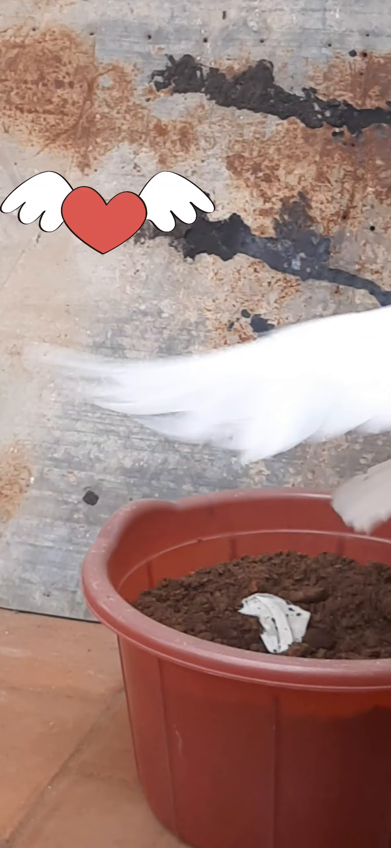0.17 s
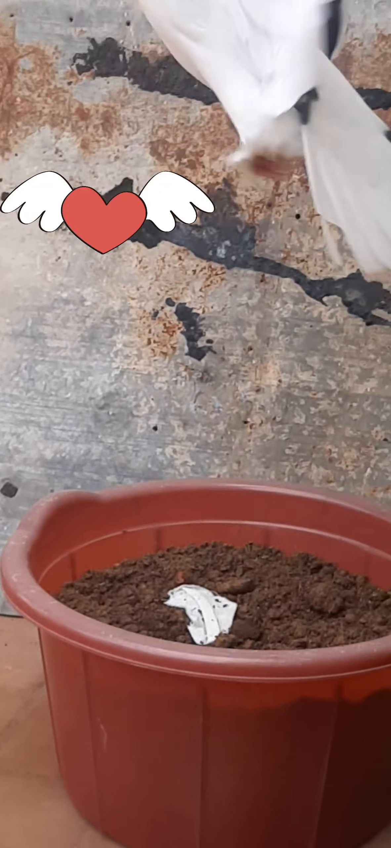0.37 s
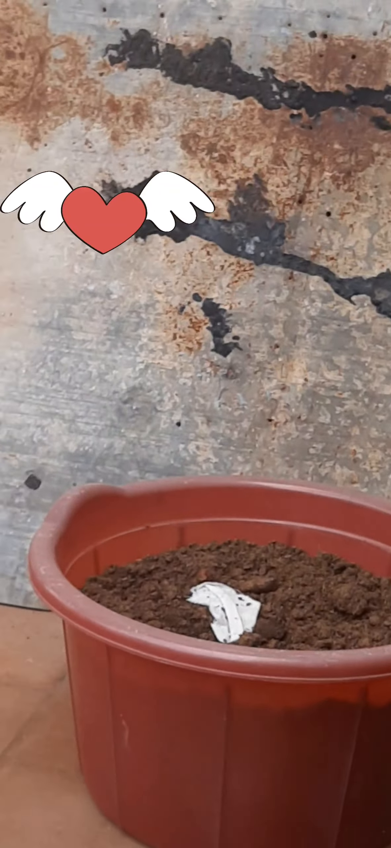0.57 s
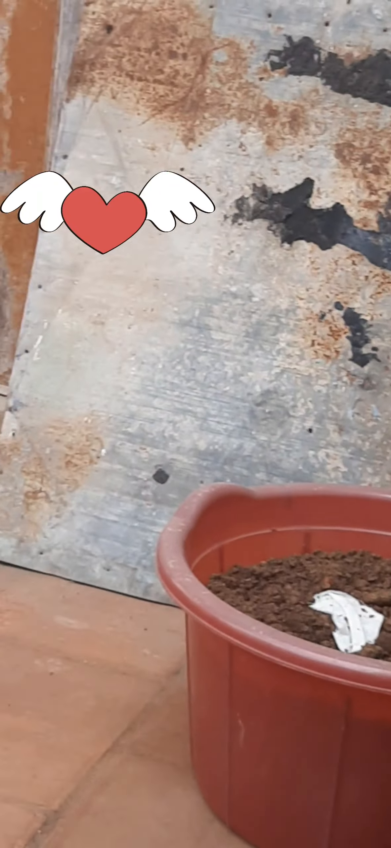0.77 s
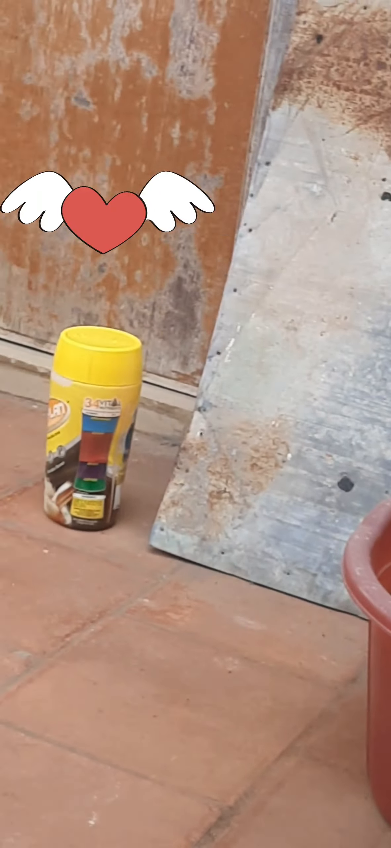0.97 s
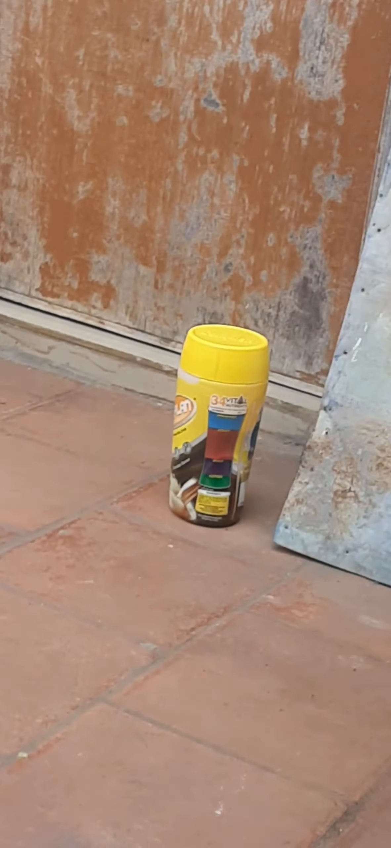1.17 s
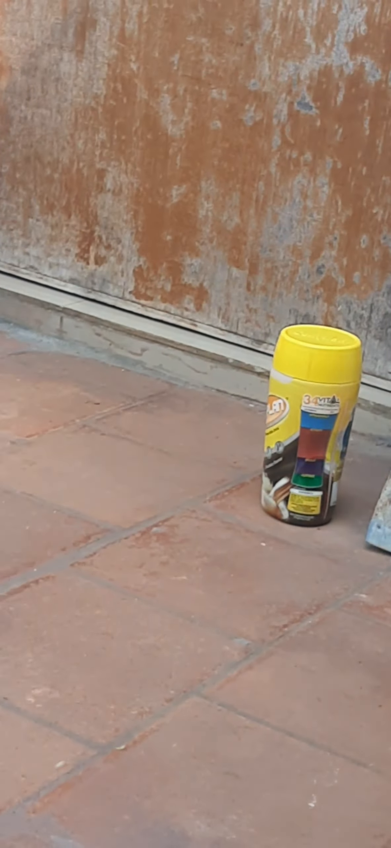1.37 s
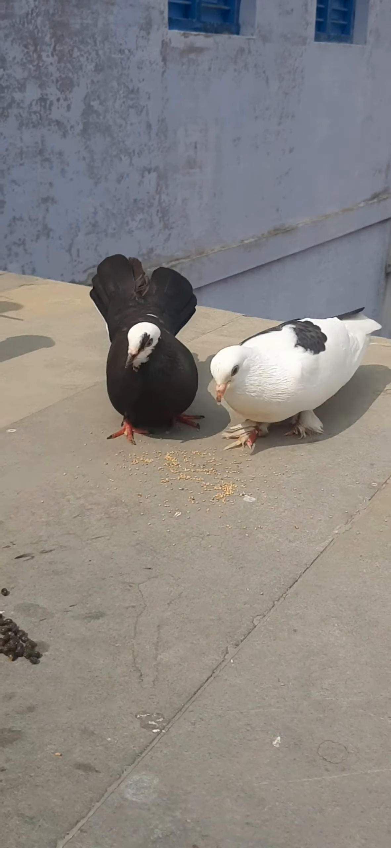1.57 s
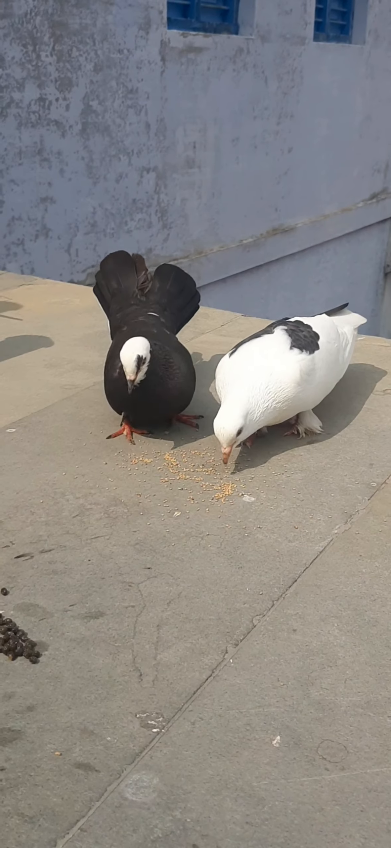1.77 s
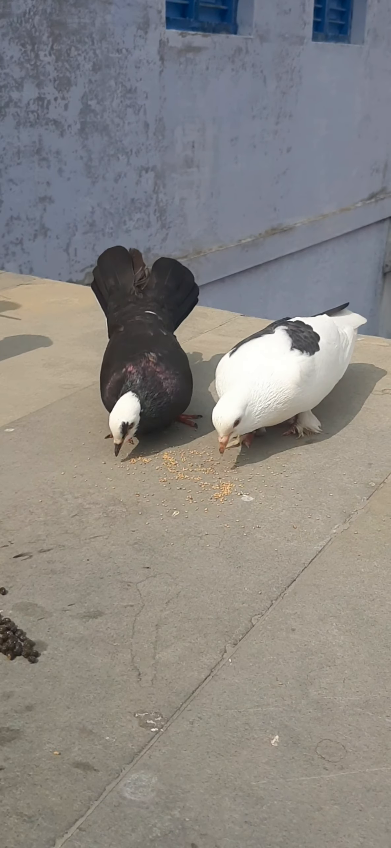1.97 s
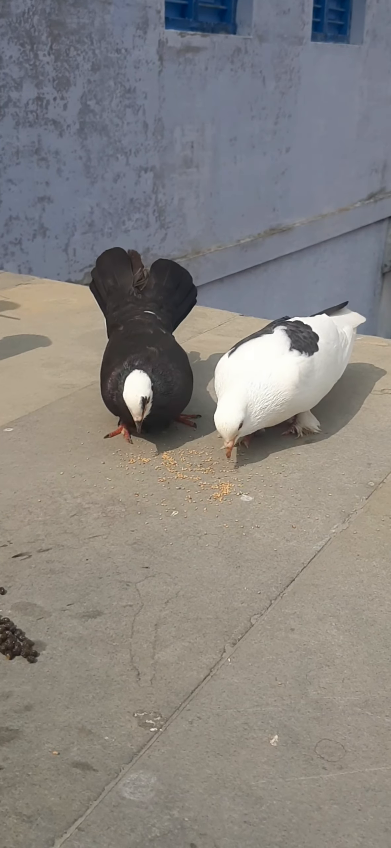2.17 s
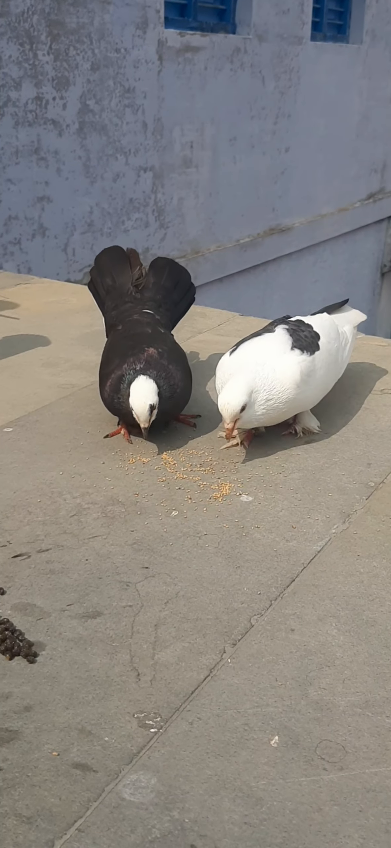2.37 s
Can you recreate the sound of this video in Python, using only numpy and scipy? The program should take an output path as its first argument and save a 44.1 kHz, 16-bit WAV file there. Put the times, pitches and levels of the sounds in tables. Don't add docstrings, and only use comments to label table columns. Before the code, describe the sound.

A pigeon's wings clap loudly in a hard-walled yard as it takes off, then near-quiet outdoor air

```python
import sys
import numpy as np
from scipy import signal
from scipy.fft import rfft, irfft
from scipy.io import wavfile
from scipy.ndimage import uniform_filter1d

SR = 44100
rng = np.random.default_rng(int(sys.argv[2]) if len(sys.argv) > 2 else 0)


def log_audio(samples):
    frames = np.atleast_2d(samples).T
    limited = np.clip(frames, -1, 1)
    pcm = np.round(limited * 32767).astype(np.int16)
    wavfile.write(sys.argv[1], SR, pcm)


def convert_level_to_amplitude(level_db):
    exponent = np.asarray(level_db, float) / 20
    return 10 ** exponent


N = 110250

# freq_hz, likeness
LIKENESS = [(60, 1), (130, 0.8), (290, 1), (640, -0.046), (1400, -0.018), (3100, -0.019)]


def evened(x):
    return x / np.sqrt(np.mean(x ** 2) + 1e-20)


def read(points, hz):
    f, value = np.transpose(points)
    return np.interp(np.log(hz + 1), np.log(f + 1), value)


def curve(rows, column=1):
    rows = np.array(rows)
    return np.interp(np.arange(N) / SR, rows[:, 0], rows[:, column])


def add(mix, start_s, sound):
    part = mix[..., round(start_s * SR):][..., :sound.shape[-1]]
    part += sound[..., :part.shape[-1]]


def resonate(x, hz, width_hz):
    turn = np.exp(2j * np.pi * np.cumsum(hz * np.ones(x.shape[-1])) / SR)
    r = np.exp(-np.pi * width_hz / SR)
    return 2 * (turn * signal.lfilter([(1 - r) ** 2], [1, -2 * r, r * r], x / turn)).real


def wobble(count, span_s):
    span = int(span_s * SR) + 1
    once = uniform_filter1d(rng.standard_normal(count), span)
    return evened(uniform_filter1d(once, span))


def paired(left, other, hz):
    same = np.clip(read(LIKENESS, hz), -1, 1)[:, None]
    return np.array([left, same * left + np.sqrt(1 - same ** 2) * other])


def air(colour, patchy_db):
    hz = np.fft.rfftfreq(1024, 1 / SR)
    a, b, c, d, patches = rng.standard_normal((N // 256 + 5, 513, 5)).T
    patches = evened(uniform_filter1d(uniform_filter1d(patches, 14, 0), 6, 1))
    z = paired(a + 1j * b, c + 1j * d, hz)
    z = z * convert_level_to_amplitude(read(colour, hz)[:, None] + patchy_db * patches)
    return evened(signal.istft(z, nperseg=1024, noverlap=768)[1][:, :N])


def yard(x):
    # freq_hz, t60_s
    decay = [(200, 0.07), (1000, 0.64), (4000, 0.29), (15000, 0.3)]
    taps = np.zeros((2, SR // 2))
    at = np.arange(200, SR // 2 - 20, 20) + rng.integers(0, 20, (2, (SR // 2 - 201) // 20))
    np.put_along_axis(taps, at, rng.choice([-1., 1.], at.shape), 1)
    hz, t, z = signal.stft(taps, SR, nperseg=256)
    z = paired(z[0], z[1], hz) * convert_level_to_amplitude(-60 * t / read(decay, hz)[:, None])
    tail = signal.istft(z, SR, nperseg=256)[1]
    return signal.fftconvolve(x, tail / np.linalg.norm(tail[0]), axes=1)[:, :N]


def yard_air():
    # freq_hz, level_db
    colour = [(18, -33.5), (30, -18), (160, 12.5), (1230, -14.5), (2240, -32.5), (2910, -18.5),
              (5310, -11.5), (8950, -45.5), (15500, -45.5)]
    return air(colour, 2.6) * convert_level_to_amplitude(-59.5)


def feather_rush():
    # freq_hz, level_db
    colour = [(59, -35.5), (100, -3), (370, -9.5), (808, -7.5), (1260, -12), (1520, -11), (7410, -19.5),
              (8580, -22.5), (15500, -14)]
    # time_s, level_db
    rush = [(0, -81), (.13, -72.5), (.2, -55.5), (.255, -48.5), (.3, -52.5), (.38, -43), (.45, -43),
            (.56, -42), (.69, -47), (.78, -49), (.85, -56.5), (.93, -53.5), (.985, -50.5), (1.05, -47.5),
            (1.19, -51), (1.255, -46.5), (1.36, -55.5), (1.5, -56.5)]
    return air(colour, 1) * convert_level_to_amplitude(curve(rush) + 11 + 2.2 * wobble(N, 0.013))


def air_push():
    # time_s, level_db
    push = [(0.0, -59), (0.132, -66), (0.17, -54), (0.21, -84), (0.236, -47), (0.61, -34.5), (0.672, -41),
            (0.726, -33.5), (0.774, -40.5), (1.144, -40), (1.566, -50.5), (1.58, -64.5)]
    lump_db = -1
    low = evened(resonate(rng.standard_normal(N), hz=68.3, width_hz=43))
    ports = low + .08 * np.array([[1], [-1]]) * low[::-1]
    return ports * convert_level_to_amplitude(curve(push) + lump_db * wobble(N, .02))


def swishes():
    # start_s, length_s, first_hz, last_hz, level_db
    sweeps = [
        (0.024, 0.095, 2400, 1920, -57.5),
        (0.066, 0.096, 1640, 1420, -64.5),
        (0.127, 0.039, 6100, 4770, -57),
        (0.132, 0.14, 4680, 2575, -40),
        (0.152, 0.091, 4430, 3520, -46),
        (.155, 0.04, 2100, 1750, -57.5),
        (0.295, 0.046, 2170, 2380, -43),
        (0.3, .03, 4900, 4860, -50),
    ]
    peaks = [.22, .5, .4, .62, .55, .4, .45, .5]
    width_share, patchy_db = .12, 2
    out = np.zeros((2, N))
    for (start_s, length_s, first_hz, last_hz, db), peak in zip(sweeps, peaks):
        u = np.arange(0, length_s, 1 / SR) / length_s
        hz = last_hz + (first_hz - last_hz) * (1 - u) ** 2.6
        noise = rng.standard_normal((2, SR // 4))[:, :len(u)]
        fuzz = evened(resonate(noise, hz, width_share * first_hz))
        swell = np.sin(np.pi * u ** (np.log(.5) / np.log(peak)))
        level = convert_level_to_amplitude(db + patchy_db * wobble(SR // 4, 0.0044)[:len(u)])
        add(out, start_s, level * swell * fuzz)
    return out


def whistles():
    # start_s, length_s, first_hz, last_hz, level_db
    downstrokes = [(.135, .085, 570, 600, -56), (.165, .035, 1480, 1580, -58), (.258, .026, 800, 900, -45),
                   (.318, .035, 520, 610, -47), (.383, .04, 650, 960, -36), (.402, .02, 900, 1150, -40),
                   (.5, .052, 740, 910, -37), (.565, .022, 900, 1020, -41), (.618, .052, 740, 880, -36),
                   (.752, .085, 570, 815, -34.5), (.9, .055, 760, 800, -43), (1.212, .018, 1020, 930, -42),
                   (1.25, .075, 560, 690, -46), (1.285, .04, 1530, 1580, -48), (1.37, .05, 600, 560, -43),
                   (1.425, .075, 1560, 1620, -50), (1.558, .022, 1000, 1100, -46)]
    bend, droop, waver_share = .2, .1, .016
    fade_db, flutter_db = -4, 1.5
    clean, width_hz = .78, 90
    quill_hz, quill_width_hz = 1580, 290
    out = np.zeros((2, N))
    for start_s, length_s, first_hz, last_hz, db in downstrokes:
        u = np.arange(0, length_s, 1 / SR) / length_s
        waver = wobble(SR // 6, .003)[:len(u)]
        flutter = wobble(SR // 6, .005)[:len(u)]
        slide_hz = last_hz + (first_hz - last_hz) * np.exp(-u / bend)
        pitch_hz = slide_hz * (1 - droop * u ** 2 + waver_share * waver)
        phase = 2 * np.pi * np.cumsum(pitch_hz) / SR
        octave_db = -1 - np.minimum(6 * ((2 * pitch_hz - quill_hz) / quill_width_hz) ** 2, 30)
        noise = rng.standard_normal((2, SR // 6))[:, :len(u)]
        tone = 0
        for k, gain_db in ((1, 0.019), (2, octave_db)):
            pure = np.sqrt(2) * np.sin(k * phase + np.array([[0], [1.1 * k]]))
            breath = evened(resonate(noise, k * pitch_hz, k * width_hz))
            tone = tone + convert_level_to_amplitude(gain_db) * (clean * pure + (1 - clean) * breath)
        swell = np.sqrt(np.sin(np.pi * u ** 0.28).clip(0))
        level = np.sqrt(2) * convert_level_to_amplitude(db + fade_db * u + flutter_db * flutter)
        add(out, start_s, swell * level * tone)
    return out


def thumps():
    # start_s, level_db, pitch_hz
    puffs = [
        (0.237, -42, 127),
        (0.351, -33, 123),
        (0.47, -29, 124),
        (0.588, -29.5, 117),
        (0.712, -31, 120),
        (0.856, -32.5, 109),
        (1.002, -39.5, 89.5),
        (1.371, -40.5, 150),
        (1.382, -45.5, 282),
    ]
    rise_s, t60_s = .004, .11
    out, t = np.zeros((2, N)), np.arange(SR // 8) / SR
    for start_s, db, hz in puffs:
        level = 2 * convert_level_to_amplitude(db - 60 * t / t60_s) * (1 - np.exp(-t / rise_s))
        add(out, start_s, level * np.sin(2 * np.pi * hz * t)[None])
    return out


def claps():
    # start_s, peak_db, brightness_db, left_right_db, loudest_crack_ms
    main = [
        (0.4672, -5.5, 3.5, 1.5, 4.2),
        (0.5855, -5.5, 2, -1.5, 6.1),
        (0.7104, -8.5, -5.5, 1, 6),
        (0.855, -10.5, -4, 1.5, 0.79),
        (0.9977, -24.5, 1, 4.5, 1.6),
        (1.2153, -32.5, -27, 1, 6.8),
        (1.3695, -17, -2.5, 1, 2.1),
        (1.5185, -14, 6.5, 1.5, 1.6),
    ]
    late_tips = [
        (1.383, -27, -12, 2.5, 3.1),
        (1.5325, -19, 6, -4, 2.2),
        (.868, -21, -5, 0, 3.1),
    ]
    # freq_hz, level_db
    colour = [(35, -40), (60, -6), (953, -2.5), (1740, -7), (2010, -3), (2360, -6), (5450, -4), (8670, -8),
              (15500, -6)]
    count, spread_s, crack_db, crack_s, fall_db_per_ms = 10, .012, -7, 0.00096, 1.7
    puff_db, puff_rise_s, puff_t60_s = -11, 0.0037, 0.065
    out, t = np.zeros((2, N)), np.arange(SR // 8) / SR
    noise = air([(20, 0.0061), (20000, 0.0095)], 0)
    events = main + late_tips
    draws = rng.random((len(events), count, 2))
    for (start_s, db, bright_db, pan_db, top_ms), draw in zip(events, draws):
        when_s = 0.00091 + spread_s * (np.arange(count) + draw[:, 0])[:, None] / count
        late_s = t - when_s
        off_db = fall_db_per_ms * abs(when_s / .001 - top_ms)
        crack_level = convert_level_to_amplitude(crack_db - off_db - 1.5 * draw[:, 1:])
        cracks = ((late_s >= 0) * np.exp(-abs(late_s) / crack_s) * crack_level).sum(axis=0)
        rise = np.minimum(t / (puff_rise_s * top_ms / 4), 1) ** 2
        shape = cracks + convert_level_to_amplitude(puff_db - 60 * t / puff_t60_s) * rise
        burst = noise[:, round(start_s * SR):][:, :len(t)] * shape
        tilted = signal.lfilter([1], [1, -.5 * np.tanh(-bright_db / 10)], burst)
        add(out, start_s, tilted * convert_level_to_amplitude(db + pan_db * np.array([[.5], [-.5]])))
    log_gain = np.log(convert_level_to_amplitude(read(colour, abs(np.fft.fftfreq(4096, 1 / SR)))))
    body = np.fft.ifft(np.exp(log_gain - 1j * signal.hilbert(log_gain).imag)).real[:2048]
    out = signal.oaconvolve(out, body[None] / np.linalg.norm(body))[:, :N]
    return out + convert_level_to_amplitude(-6) * yard(out)


def small_bird():
    # time_s, pitch_hz, level_db, second_harmonic_db
    call = [(.882, 1550, -47, -14), (.932, 1540, -46, -12), (.945, 1440, -45, -6), (.965, 1415, -43, 3),
            (1.015, 1400, -38, -2), (1.035, 1470, -46, -4), (1.05, 1560, -41, -13), (1.066, 1630, -48, -6),
            (1.082, 1720, -42, -3), (1.113, 1980, -37, -16), (1.135, 2100, -46, -9),
            (1.158, 2270, -34, -26), (1.186, 2270, -36, -28), (1.193, 2120, -46, -25),
            (1.203, 1970, -38, -25), (1.222, 1790, -46, -25)]
    third_db, waver_share, flutter_db, ring_db, yard_db = -6, .007, 2.5, 7, -10
    t = np.arange(N) / SR
    pitch_hz = curve(call) * (1 + waver_share * wobble(N, 0.0022))
    phase = 2 * np.pi * np.cumsum(pitch_hz) / SR
    second = convert_level_to_amplitude(curve(call, column=3))
    over = second * (np.sin(2 * phase) + convert_level_to_amplitude(third_db) * np.sin(3 * phase))
    sounding = (t > call[0][0]) * (t < call[-1][0])
    level = np.sqrt(2) * convert_level_to_amplitude(curve(call, column=2) + flutter_db * wobble(N, 0.0035)) * sounding
    tone = level * (np.sin(phase) + over)
    echoed = level * (np.sin(phase) + convert_level_to_amplitude(ring_db) * over)
    direct = np.array([.6 * tone, np.roll(tone, 3)])
    return direct + convert_level_to_amplitude(yard_db) * yard(np.array([echoed, echoed]))


def wash():
    # freq_hz, level_db
    colour = [(18, -71.5), (30, -63), (102, -5.5), (249, -22.5), (709, -31.5), (945, -33), (5310, -45.5),
              (8280, -55), (15500, -43.5)]
    # time_s, level_db
    swell = [(1.62, -56), (1.754, -55.5), (1.784, -60), (2.45, -54), (2.5, -49)]
    return air(colour, 1.2) * convert_level_to_amplitude(curve(swell) + 5.5)


def traffic_drone():
    # time_s, level_db
    swell = [(1.62, -49.5), (2.166, -47.5), (2.226, -50.5), (2.5, -41)]
    return evened(resonate(rng.standard_normal(N), hz=101.6, width_hz=22)) * convert_level_to_amplitude(curve(swell))


def suppressed_hiss():
    # freq_hz, level_db
    colour = [(240, -46), (400, -19), (466, -38), (715, -5.5), (1280, -6.5), (2060, -5), (7670, -7),
              (15500, -23.5)]
    shut_s, fall_s, shut_db, reopen_s, reopen_db = 1.7386, 0.013, -26.5, 2.29, -11.5
    gain_db = np.interp(np.arange(N) / SR, [shut_s, shut_s + fall_s, reopen_s, N / SR],
                        [0, shut_db * 1.23, shut_db, reopen_db])
    return air(colour, 0.49) * convert_level_to_amplitude(-47 + gain_db)


def hoots():
    # start_s, length_s, pitch_hz, level_db
    calls = [
        (1.636, 0.026, 723, -56),
        (1.711, .12, 737, -57.5),
        (1.869, .04, 747, -67),
        (1.97, 0.044, 705, -62),
        (2.205, 0.058, 709, -59),
        (2.28, 0.029, 730, -65),
        (2.319, 0.035, 718, -63),
        (2.42, 0.036, 846, -61),
    ]
    out = np.zeros((2, N))
    for start_s, length_s, hz, db in calls:
        t = np.arange(0, length_s, 1 / SR)
        swell = np.sqrt(2 * np.sin(np.pi * t / length_s).clip(0))
        add(out, start_s, swell * convert_level_to_amplitude(db) * np.sin(2 * np.pi * hz * t + np.array([[0], [.4]])))
    return out


def rustles():
    # start_s, length_s, centre_hz, width_hz, level_db
    gusts = [(1.791, .05, 314, 60, -56.5), (1.8, 0.061, 1500, 398, -66), (1.936, 0.071, 1690, 500, -63),
             (2.005, 0.063, 1150, 302, -63), (2.047, 0.06, 340, 80, -55.5), (2.055, 0.047, 5500, 2000, -67),
             (2.078, 0.048, 1600, 600, -63.5), (2.189, 0.12, 1600, 600, -64.5),
             (2.29, 0.099, 1110, 500, -63), (2.316, 0.07, 333, 80, -52.5),
             (2.355, 0.055, 4370, 4000, -59.5), (2.41, 0.061, 4500, 4000, -60.5),
             (2.413, 0.077, 1490, 800, -56.5)]
    out = np.zeros((2, N))
    for start_s, length_s, hz, width_hz, db in gusts:
        t = np.arange(0, length_s, 1 / SR)
        gust = evened(resonate(rng.standard_normal((2, SR // 6)), hz, width_hz))[:, :len(t)]
        add(out, start_s, convert_level_to_amplitude(db) * np.sin(np.pi * t / length_s) * gust)
    return out


def scene():
    cut_s, fade_s, resume_s = 1.5795, .003, 1.6095
    t = np.arange(N) / SR
    wings = air_push() + swishes() + whistles() + thumps() + claps()
    takeoff = yard_air() + feather_rush() + wings + small_bird()
    terrace = wash() + traffic_drone() + suppressed_hiss() + hoots() + rustles()
    return takeoff * np.clip((cut_s - t) / fade_s, 0, 1) ** 2 + terrace * (t > resume_s)


def top_cut(x):
    return signal.sosfilt(signal.butter(12, 16810, fs=SR, output="sos"), x)


def record(dry):
    # freq_hz, level_db
    response = [(28, -6), (55, -0.5), (7900, 2), (8400, -6.5), (9700, -4.5), (10600, -1.5)]
    headroom, edge_hz = .75, 15750
    heard = irfft(rfft(dry) * convert_level_to_amplitude(read(response, np.fft.rfftfreq(N, 1 / SR))), N)
    squashed = headroom * np.tanh(heard / headroom)
    lowpass = signal.firwin(255, edge_hz, window=("kaiser", 9), fs=SR)
    limited = signal.oaconvolve(squashed, lowpass[None], "same")
    return top_cut(limited)


dry = scene()
out = record(dry)
log_audio(out)
```